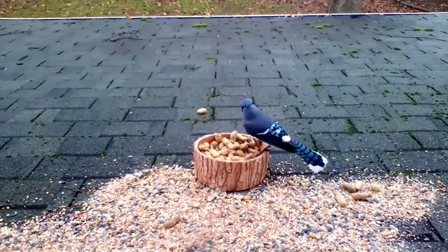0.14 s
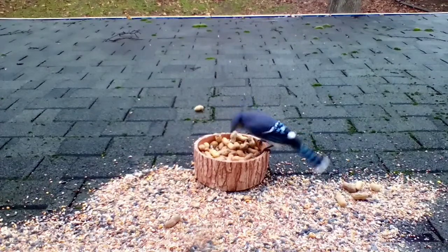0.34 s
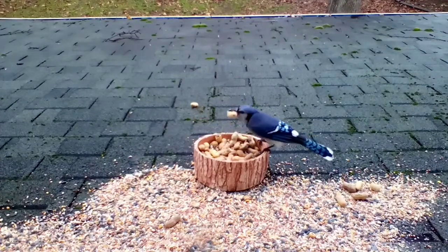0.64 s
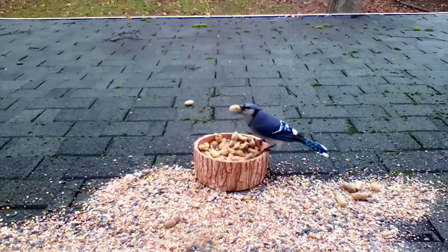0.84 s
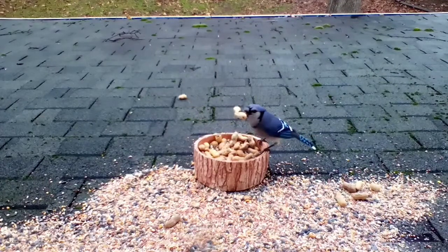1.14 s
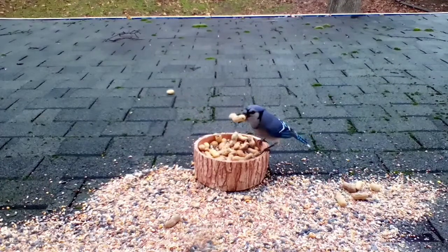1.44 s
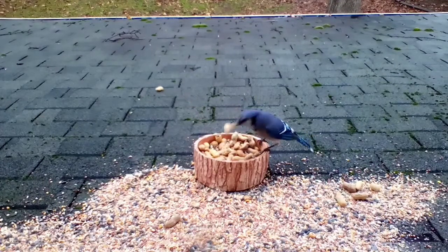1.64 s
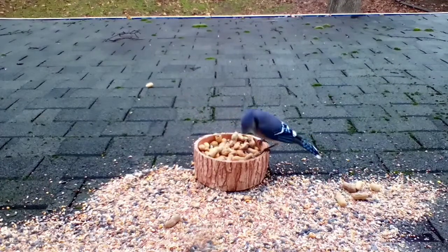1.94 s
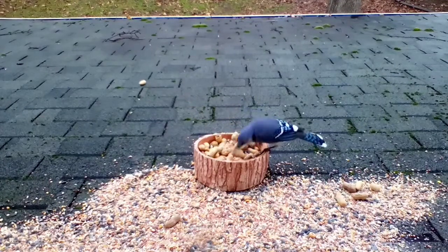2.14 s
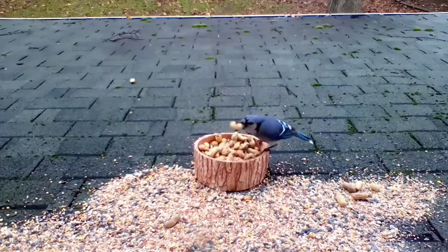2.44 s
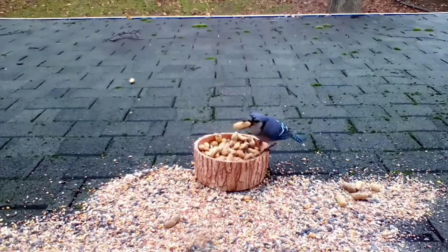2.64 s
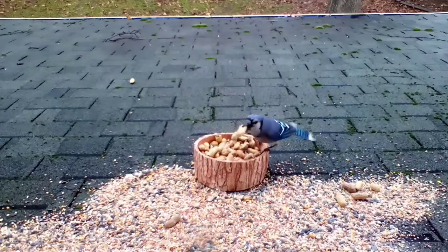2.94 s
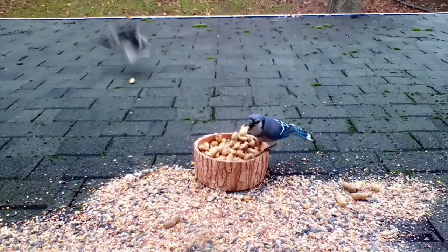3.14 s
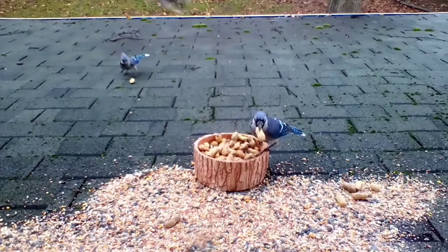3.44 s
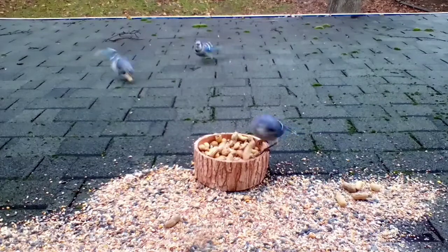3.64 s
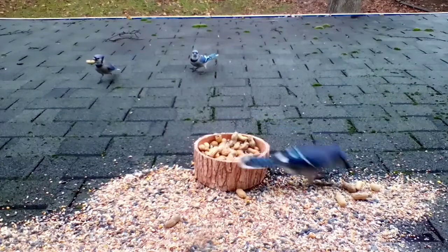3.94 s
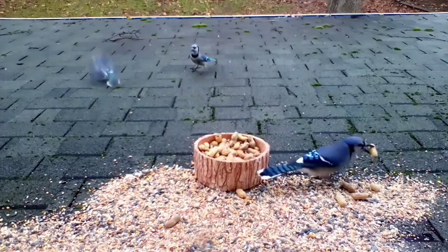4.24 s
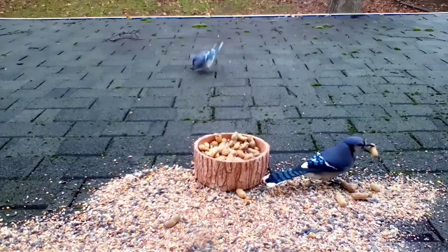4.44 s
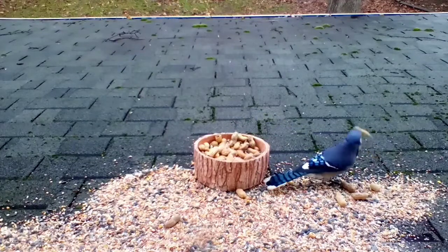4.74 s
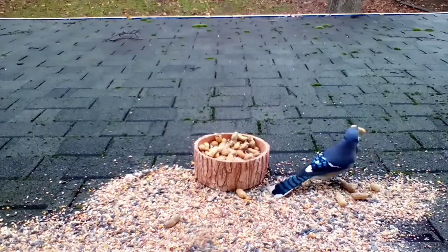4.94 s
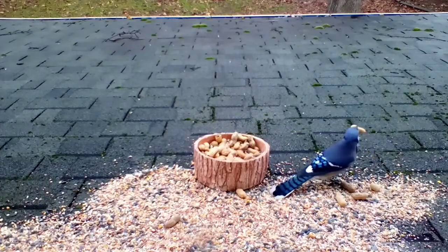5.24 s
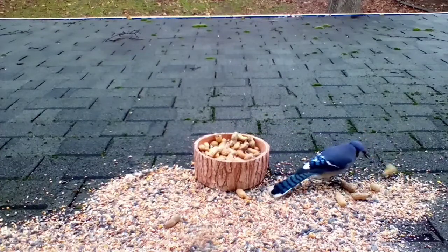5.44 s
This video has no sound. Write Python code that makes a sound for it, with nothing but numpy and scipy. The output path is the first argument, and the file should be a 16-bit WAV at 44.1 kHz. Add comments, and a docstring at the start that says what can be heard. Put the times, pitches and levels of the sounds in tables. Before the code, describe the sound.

Beaks and claws tick and rustle among peanuts over low distant traffic, then one loud harsh jay call rasps out and rings briefly.

```python
"""Blue jays at a bowl of peanuts on a paved yard, over distant traffic, patchy hiss and recorder hiss.
From 0.6 s on beaks, claws and wing feathers tick and rustle: short showers of clicks with a ring.
From 1.1 to 1.9 s a far hum of two sine partials swells and fades while it rises in pitch.
At 3.1 s one jay gives a single harsh call, a clear voice that turns into a rasp: partials and
pulsed air noise through resonances. Contacts go on after it; decaying noise echoes ring round the yard."""
import sys
import numpy as np
from scipy import signal
from scipy.fft import rfft, irfft, next_fast_len
from scipy.io import wavfile
from scipy.ndimage import uniform_filter1d

SR = 44100
rng = np.random.default_rng(int(sys.argv[2]) if len(sys.argv) > 2 else 0)


def master(y):
    """Save y as 16-bit WAV."""
    cut = np.clip(np.atleast_2d(y).T, -1, 1)
    pcm = np.round(cut * 32767)  # scale
    wavfile.write(sys.argv[1], SR, pcm.astype(np.int16))


N = 246518


def from_db(db):
    """Level to amplitude: 20 dB is a factor of ten."""
    return 10 ** (np.asarray(db) / 20)


def rms_one(x):
    """Normalisation: the signal scaled to unit root-mean-square amplitude."""
    return x / np.sqrt(np.mean(np.abs(x) ** 2) + 1e-20)


def in_time(rows, t):
    """Linear interpolation: the columns of a curve table at times t."""
    times_s, *columns = np.transpose(rows)
    return [np.interp(t, times_s, column) for column in columns]


def ramp(t, start_s, end_s, before, after):
    """Linear transition between two steady values."""
    return np.interp(t, [start_s, end_s], [before, after])


def coloured(x, spectrum):
    """Linear filtering: x through a spectrum drawn on a log-frequency axis, at unit rms."""
    hz, db = np.transpose(spectrum)
    bins_hz = np.maximum(np.arange(len(x) // 2 + 1) * SR / len(x), 1)
    gain = from_db(np.interp(np.log(bins_hz), np.log(hz), db))
    return rms_one(irfft(rfft(x) * gain, len(x)))


def drift(size, hz):
    """Slow random fluctuation: white noise twice through a one-pole low-pass, at unit rms."""
    r = np.exp(-2 * np.pi * hz / SR)
    settle = SR // 20
    slow = signal.lfilter([1], [1, -2 * r, r * r], rng.standard_normal(size + settle))
    return rms_one(slow[settle:])


def patchy(spectrum, depth_db, rate_hz, edge_count):
    """Band-wise modulation: noise in narrow bands, each swelling and sinking on its own."""
    size = next_fast_len(N)
    hz = np.arange(size // 2 + 1) * SR / size
    noise = rfft(coloured(rng.standard_normal(size), spectrum))
    edges_hz = np.geomspace(spectrum[0][0], spectrum[-1][0], edge_count)
    out = 0
    for low_hz, high_hz in zip(edges_hz, edges_hz[1:]):
        # drawn once per 64 samples, then held and smoothed
        slow = np.repeat(drift(N // 64 + 1, 64 * rate_hz), 64)[:N]
        band = irfft(noise * ((hz >= low_hz) & (hz < high_hz)), size)[:N]
        out = out + band * uniform_filter1d(from_db(depth_db * slow), size=128)
    return rms_one(out)


def recorder_hiss():
    """Stationary noise: a steady random signal is described by its spectrum and level alone."""
    # relative spectral density: frequency_hz, density_db (per Hz)
    hiss_spectrum = [(3820, -29), (6500, -12), (7600, -14.5), (8460, -13), (13400, -15.5), (15100, -2.5),
                     (15800, -16.5)]
    return from_db(-79.5) * coloured(rng.standard_normal(N), hiss_spectrum)


def distant_traffic():
    """Incoherent sum: many far sources merge into low noise whose bands fluctuate independently."""
    # relative spectral density: frequency_hz, density_db (per Hz)
    traffic_spectrum = [(13, -67.5), (22, -44.5), (56, -6), (138, 0), (180, -1.5), (239, -2.5), (266, -5),
                        (290, -6), (406, -12), (436, -11), (538, -15.5), (642, -13.5), (915, -21),
                        (1130, -17), (1500, -37), (1950, -63.5), (3300, -120)]
    # level curve: time_s, level_db
    traffic_level = [(0, -46.5), (.8, -48), (1.5, -46), (3.9, -46.5), (5.59, -48)]
    level_db, = in_time(traffic_level, np.arange(N) / SR)
    return from_db(level_db) * patchy(traffic_spectrum, depth_db=2.5, rate_hz=4.0, edge_count=30)


def patchy_hiss():
    """Band-wise modulation: faint mid-band hiss, patchy, its narrow bands quickly swelling and sinking."""
    # relative spectral density: frequency_hz, density_db (per Hz)
    patchy_spectrum = [(880, -24), (1500, -1), (1750, -3.5), (2230, -3.5), (3150, 0.5), (4120, -2.5),
                       (4870, 1), (5770, -1.5), (6510, -4.5), (7500, -16.5), (9750, -48.5), (16500, -120)]
    # level curve: time_s, level_db
    patchy_level = [(0, -67.5), (1.3, -66.5), (1.5, -64), (2.04, -68), (2.65, -66), (3.3, -68.5),
                    (3.83, -64), (4.29, -66.5), (4.79, -62.5), (5.16, -67)]
    level_db, = in_time(patchy_level, np.arange(N) / SR)
    return from_db(level_db) * patchy(patchy_spectrum, depth_db=3.0, rate_hz=9.0, edge_count=60)


def far_hum():
    """Harmonic tone: a gliding fundamental and its third partial, which fades sooner."""
    start_s, low_end_s, third_end_s, edge_s = 1.1, 1.89, 1.73, 0.11
    start_hz, rise_hz_per_s = 161, 13
    low_db, third_db = -52, -58.5
    t = np.arange(N) / SR
    phase = 2 * np.pi * np.cumsum(start_hz + rise_hz_per_s * (t - start_s)) / SR
    low, third = (np.clip(np.minimum(t - start_s, end_s - t) / edge_s, 0, 1)
                  for end_s in (low_end_s, third_end_s))
    low_tone = from_db(low_db) * low * np.sin(phase)
    third_tone = from_db(third_db) * third * np.sin(3 * phase)
    return np.sqrt(2) * (low_tone + third_tone)   # a sine's rms is 1 / sqrt(2)


def yard(x):
    """Reverberation by convolution: near echoes of paving and wall, longer scatter of fences and trees."""
    # relative density of the far echoes: frequency_hz, density_db (per Hz)
    far_spectrum = [(1500, 8), (2000, -11.5), (2600, 0.5), (3400, 4.5), (4000, -4.5), (7000, -13),
                    (10000, -19)]
    near_t60_s, near_db = 0.16, -14.5
    far_t60_s, far_db = 0.6, -20.5
    t = np.arange(SR) / SR
    near_decay = from_db(-60 * t / near_t60_s) * (t > .002)
    far_decay = from_db(-60 * t / far_t60_s) * (t > .01)
    near = rms_one(rng.standard_normal(SR) * near_decay)
    far = rms_one(coloured(rng.standard_normal(SR), far_spectrum) * far_decay)
    echoes = (from_db(near_db) * near + from_db(far_db) * far) / np.sqrt(SR)   # levels as total energy
    return x + signal.fftconvolve(x, echoes)[:N]


def bandpassed(x, low_hz, high_hz):
    """Band-pass resonance: only the energy near one band is kept, at unit rms."""
    sos = signal.butter(2, [low_hz, high_hz], "band", fs=SR, output="sos")
    return rms_one(signal.sosfilt(sos, x))


def rustles():
    """Impact noise: each contact is a shower of uneven clicks, a broad scratch with a ring and bright edge."""
    # contacts of beaks, claws and feathers: start_s, level_db (roughly the scratch's peak), ring_hz,
    # ring_db and bright_db (both relative to the scratch)
    contacts = [(0.622, -49, 3070, 11.5, -18), (0.8052, -55, 5600, -4, -30), (0.863, -52.5, 5300, -1, -30),
                (1.059, -45, 3150, 1, -30), (1.2603, -43, 3850, -3, -32), (1.406, -51.5, 4200, -3, -26),
                (1.523, -60, 2880, 3, -30), (1.7592, -42.5, 3230, 2, -33), (2.0712, -54.5, 4860, -9, -21),
                (2.4436, -36, 4640, -7, -28), (2.5375, -38, 2700, -7, -33), (2.6522, -44, 2260, -1.5, -40),
                (2.7727, -43, 6240, -16, -28), (2.957, -42, 2680, -12, -16.5),
                (3.0187, -49.5, 3100, -1, -30), (3.6547, -48.5, 3760, -4, -30),
                (3.6654, -43.5, 4570, -10, -27), (3.7493, -38.5, 4900, -11, -38),
                (3.7941, -39.5, 5350, -8, -23), (3.8061, -36.5, 2650, -8, -25),
                (3.8443, -54, 6260, 15.5, -24), (3.914, -50, 4270, -2, -28), (3.9296, -47, 5440, 4, -24),
                (3.9994, -54, 5030, -11, -25), (4.7217, -49.5, 2730, -8, -22), (4.785, -55, 3450, -1, -28),
                (5.3912, -37, 4810, -6.5, -28)]
    # relative spectral density of the scratch: frequency_hz, density_db (per Hz)
    scratch_spectrum = [(700, -34.5), (1500, -4), (2500, 4.5), (5500, 1.5), (6400, 5), (7200, -6.5),
                        (7700, -16.5), (8500, -62)]
    rise_s, scratch_t60_s = .0022, .075
    ring_shortens_s_per_db = 0.0033   # a contact that rings more dies sooner
    faint_count, faint_db = 10, -60.5
    # fainter contacts fall at random
    faint = [(when * (N - 1) / SR, faint_db + 6 * louder, 2000 + 3500 * higher, 0, -28)
             for when, louder, higher in rng.random((faint_count, 3))]
    out = np.zeros(N)
    t = np.arange(SR // 4) / SR
    for start_s, level_db, ring_hz, ring_db, bright_db in [*contacts, *faint]:
        t60_s = max(scratch_t60_s - ring_shortens_s_per_db * ring_db, .01)
        shape = np.minimum(1, t / rise_s) * from_db(-60 * np.maximum(t - rise_s, 0) / t60_s)
        clicks = shape * rng.standard_normal(len(t)) * from_db(3.5 * drift(len(t), 300))
        scratch = coloured(clicks, scratch_spectrum)
        ring = from_db(ring_db) * bandpassed(clicks, ring_hz - 380, ring_hz + 380)
        bright = from_db(bright_db) * bandpassed(clicks, 10000, 12000)
        # noise peaks stand some 9.5 dB above its rms
        gain = from_db(level_db - 9.5) * np.sqrt(np.mean(shape ** 2))
        at = round(start_s * SR)
        out[at:at + len(t)] += (gain * (scratch + ring + bright))[:N - at]
    return out


def resonance(hz, centre_hz, width_hz):
    """Resonance curve: gain 1 at the centre, half at the edges of the width."""
    return 1 / (1 + (2 * (hz - centre_hz) / width_hz) ** 2)


def jay_call():
    """Source and filter: syrinx partials through windpipe and beak; period doubling adds further partials."""
    # the call's course: time_s, pitch_hz (of a strong-weak pair of cycles), level_db
    course = [(3.091, 805, -23.5), (3.095, 834, -18.5), (3.107, 923, -24.5), (3.113, 955.6, -18.5),
              (3.129, 993.6, -23.5), (3.145, 1025, -21), (3.163, 1016, -17.5), (3.193, 974, -20),
              (3.217, 982, -20), (3.227, 924, -22.5), (3.305, 842, -23.5), (3.343, 818, -23),
              (3.362, 786, -25)]
    # brief catches of the voice: time_s, half_length_s
    catches = [(3.118, 0.0013), (3.197, .002)]
    # windpipe resonances: centre_hz, width_hz, gain_db
    windpipe = [(2000, 450, -45), (2690, 260, 1), (3756, 830, 3), (8700, 2700, -28), (12070, 570, -26.5),
                (15480, 1200, -26)]
    # the beak opens and closes: time_s, resonance_hz, gain_db
    beak = [(3.094, 5060, 10), (3.106, 7130, 5), (3.118, 6260, -5), (3.17, 6040, -9), (3.19, 7700, -4),
            (3.22, 7060, -10), (3.24, 7200, 6), (3.29, 6850, 8), (3.33, 6500, 3), (3.35, 5200, -5)]
    # relative spectral density of the air: frequency_hz, density_db (per Hz)
    air_spectrum = [(700, -55.5), (1100, -12), (1400, -42.5), (1700, -18), (2600, -9), (4500, -3.5),
                    (6800, -1), (7700, -16), (10000, -25), (13300, -46), (15200, -11.5), (16000, -30)]
    # odd partials enter once the voice has settled: start_s, end_s, before_db, after_db
    odd_enter = (3.098, 3.12, -36, -7)
    beak_width_hz = 1100
    release_s, release_db, release_hz = .022, -34, -30   # the voice dies away and sags
    rasp = (3.165, 3.24)   # s; the clear voice turns into a rasp
    jitter, wander_db, smear_share = 0.0021, 1.6, .016   # shares of the pitch, except wander

    start = round(course[0][0] * SR)
    end_s, end_hz, end_db = course[-1]
    release = (end_s + release_s, end_hz + release_hz, end_db + release_db)
    t = np.arange(start, round(release[0] * SR)) / SR
    size = len(t)
    pitch_hz, level_db = in_time([*course, release], t)
    beak_hz, beak_db = in_time(beak, t)
    odd_db = ramp(t, *odd_enter) + ramp(t, *rasp, 0, 3)
    half_db = ramp(t, *rasp, -31, -10)
    rough = ramp(t, *rasp, .08, .38)
    onset_puff_db = 12 * np.exp(-(t - t[0]) / .015)
    air_db = ramp(t, *rasp, -26, -6.5) + onset_puff_db
    pitch_hz = pitch_hz * (1 + jitter * drift(size, 60))
    phase = 2 * np.pi * np.cumsum(pitch_hz) / SR

    voice, power = 0, 1e-12
    for k in np.arange(2, 20, .5):
        partial_hz = k * pitch_hz
        gain = from_db(beak_db) * resonance(partial_hz, beak_hz, beak_width_hz)
        for centre_hz, width_hz, gain_db in windpipe:
            gain = gain + from_db(gain_db) * resonance(partial_hz, centre_hz, width_hz)
        # a pattern repeating only every second time adds partials half-way between, stronger in the rasp
        gain = gain * from_db(half_db if k % 1 else odd_db * (k % 2))
        gain = gain * from_db(wander_db * drift(size, 26))   # each partial swells and tears on its own
        # uneven cycles smear each partial into a noisy band, the more the higher it lies
        blur = 1 - (1 - np.clip(rough, 0, 1)) ** (k / 4.2) * np.exp(-(k / 24.0) ** 4)
        smear_hz = smear_share * k * pitch_hz.mean()
        smear = (drift(size, smear_hz) + 1j * drift(size, smear_hz)) / np.sqrt(2)
        carrier = np.exp(1j * (k * phase + k * k))   # k * k scatters the starting phases
        voice = voice + gain * np.real((np.sqrt(1 - blur) + np.sqrt(blur) * smear) * carrier)
        power = power + gain ** 2 / 2

    # air rushes through the labia once every cycle of the pitch
    air = coloured(rng.standard_normal(size) * (1 + 0.94 * np.cos(phase)), air_spectrum)
    envelope = np.clip(np.minimum((t - t[0]) / .002, (t[-1] - t) / .004), 0, 1)
    for catch_s, half_s in catches:
        envelope = envelope * (1 - 0.56 * np.exp(-((t - catch_s) / half_s) ** 2))
    out = np.zeros(N)
    sound = voice / np.sqrt(power) + from_db(air_db) * air
    out[start:start + size] = from_db(level_db) * envelope * sound
    return out


def scene():
    """Superposition: birds with yard echoes over the background; one microphone feeds both channels."""
    background = distant_traffic() + patchy_hiss() + recorder_hiss() + far_hum()
    birds = yard(jay_call() + rustles())
    mono = birds + background
    return np.array([mono, mono])


def record(dry):
    """Band limiting: a steep low-pass removes the top, 60 dB down from 16150 Hz upwards."""
    return signal.sosfilt(signal.cheby2(16, 60, 16150, fs=SR, output="sos"), dry)


dry = scene()
out = record(dry)
master(out)
```